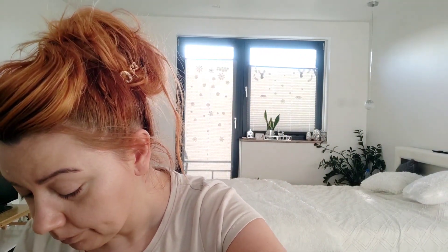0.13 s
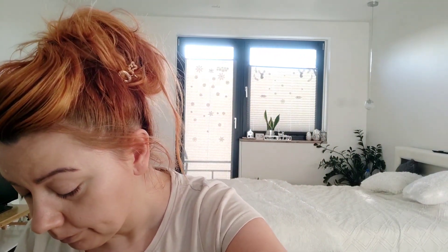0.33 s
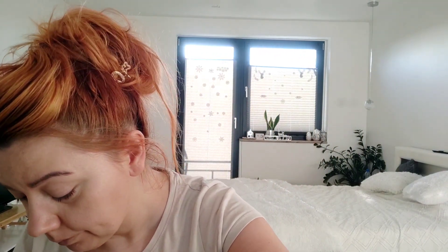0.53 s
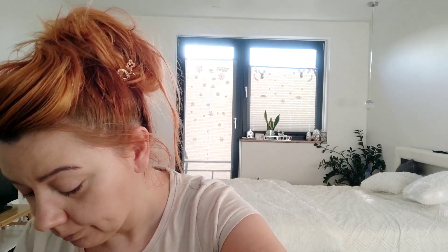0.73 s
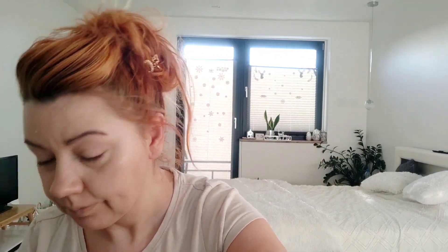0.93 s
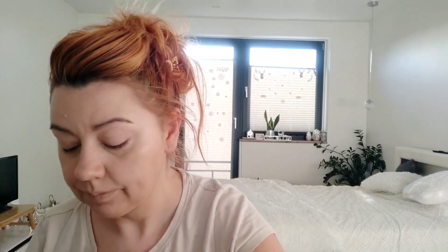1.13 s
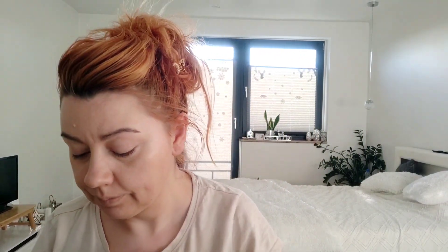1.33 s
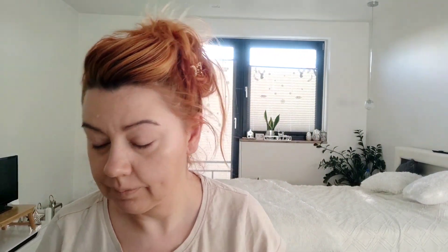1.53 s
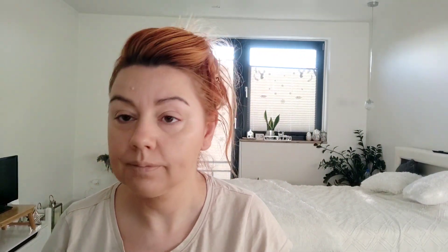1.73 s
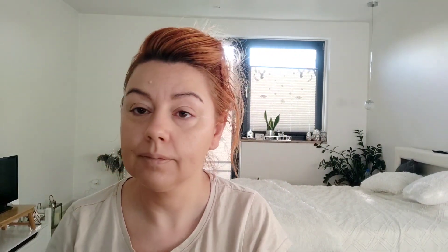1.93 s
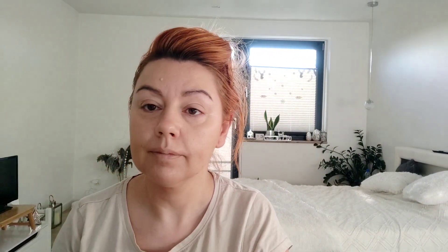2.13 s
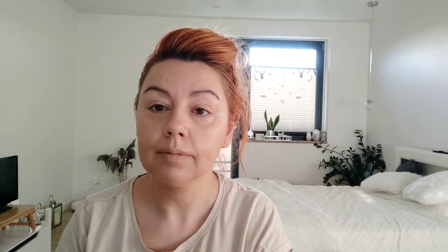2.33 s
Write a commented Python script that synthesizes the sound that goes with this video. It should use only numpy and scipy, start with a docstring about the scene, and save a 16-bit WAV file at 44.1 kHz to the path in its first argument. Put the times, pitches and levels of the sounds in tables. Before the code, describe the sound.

Rummaging in a drawer of small plastic containers, sharp clicks and hollow knocks in a bare bedroom

```python
"""Hard caps click and hollow jars clack and thump as small plastic containers are rummaged through in a
wooden desk drawer in a bare bedroom; shoves rattle and plastic rustles in between, over faint room tone.
Clicks are shaped noise, clacks and thumps dying modes; random impacts drive the rattle and the rustle.
Two spaced ports pick up the direct sound and the answering room."""
import sys
import numpy as np
from scipy import signal
from scipy.fft import rfft, irfft
from scipy.io import wavfile

SR = 44100
rng = np.random.default_rng(int(sys.argv[2]) if len(sys.argv) > 2 else 0)


def unload_wav(signal):
    """Save mono or channel-first audio to the path in sys.argv[1] as 16-bit WAV at rate SR, clipped to [-1, 1]."""
    wavfile.write(
        sys.argv[1],
        SR,
        np.round(np.clip(np.atleast_2d(signal).T, -1, 1) * 32767).astype(np.int16),
    )


def level_to_linear(level):
    """Convert decibel levels to linear amplitude factors, elementwise."""
    exponent = np.asarray(level, float) / 20
    return 10 ** exponent


N = 105531

# Room tone spectrum. Each row: frequency in Hz, relative level in dB.
HUM_SPECTRUM = [(25, 9.5), (212, 12), (2360, -56), (3590, -19), (6980, -26), (8920, -26), (11600, -27),
                (19600, -120)]
# Stirring hand. Each row: time in seconds, rattle level in dB, rustle level in dB (both before trim).
STIR = [(0, -37, -36), (0.198, -34.5, -39), (.33, -39.5, -45.5), (.45, -36.5, -43), (.52, -42.5, -39),
        (.64, -43.5, -45), (.82, -30, -32), (.93, -36.5, -34.5), (1.08, -29.5, -32), (1.2, -36, -40.5),
        (1.4, -51, -48.5), (1.579, -60.5, -65), (1.7, -41.5, -45), (1.93, -41.5, -45), (2.1, -34.5, -40.5),
        (2.25, -37, -39), (2.39, -50.5, -42)]
# Drawer modes. Each row: frequency in Hz, relative level in dB, t60 in seconds when thumped.
DRAWER_MODES = [(176.5, 1, 0.14), (273.6, 4, 0.08), (350, 2.5, 0.11), (452, -0.5, 0.21), (554, 1.5, 0.065),
                (618, 3, 0.044), (735, 1.5, 0.085), (848, 5, 0.055), (1066, 13, 0.016), (1240, -2.5, 0.1),
                (1496, -7, 0.053), (1530, -5, 0.089), (1650, 5.5, 0.017)]
# Spectrum of sliding plastic. Each row: frequency in Hz, relative level in dB.
RUSTLE_SPECTRUM = [(700, -45), (1200, -7.5), (3000, -13), (5000, -16), (6800, -10.5), (8600, -20),
                   (9600, -38.5), (13000, -42), (17000, -74)]
# Jars clacking on each other. Each row: start in seconds, peak in dB, pitch in Hz.
CLACKS = [(0.1411, -16, 1480), (0.176, -16, 1530), (0.295, -21, 1250), (0.3636, -21.5, 1530),
          (0.388, -18.5, 1830), (0.464, -16.5, 1442), (0.5073, -17.5, 1460), (0.646, -23.5, 1650),
          (0.7912, -4, 1370), (0.797, -11, 1495), (0.8368, -15, 1490), (0.9752, -10, 1240),
          (1.044, -13, 1125), (1.1076, -16.5, 2420), (1.1163, -7.5, 1693), (1.128, -14.5, 1650),
          (1.2376, -11, 1716), (1.2398, -13, 940), (1.7659, -32, 1160), (1.8578, -29.5, 1105),
          (1.9884, -19, 950), (2.0615, -27, 1740), (2.0788, -15.5, 1463), (2.164, -24.5, 1530)]
# Caps striking each other; the rows at 0.2955, 0.381 and 0.8336 s give instead the bright upper ring of jars
# clacking. Each row: start in seconds, peak in dB, cap pitch in Hz, contact length in seconds (time to fall 20
# dB).
CLICKS = [(0.142, -7.5, 6500, 0.00098), (0.174, -12.5, 7540, 0.008), (0.2955, -22, 2700, 0.0034),
          (0.381, -24.5, 2760, 0.0075), (0.461, -9.5, 2400, 0.0063), (0.468, -7, 8000, 0.0033),
          (0.51, -14.5, 2590, 0.0038), (0.62, -27.5, 7000, 0.01), (0.6701, -4, 2440, 0.0048),
          (0.7599, -6.5, 2830, 0.0027), (0.7855, -7.5, 7900, 0.0039), (0.7898, -3, 6300, 0.0055),
          (0.8336, -17, 2980, 0.0037), (0.8995, -16.5, 7350, 0.0065), (0.939, -21, 2550, 0.007),
          (0.97, -3, 5200, 0.0036), (0.977, -9, 7400, 0.0068), (1.033, -10.5, 7160, 0.005),
          (1.042, -24, 6400, 0.0023), (1.182, -15.5, 2820, 0.0014), (1.2375, -6.5, 7300, 0.0033),
          (1.395, -30, 6400, 0.003), (1.666, -23, 6540, 0.0084), (1.9895, -19.5, 2500, 0.0017),
          (2.0278, -22.5, 3630, 0.0027), (2.1885, -1, 5600, 0.0024), (2.2844, -7.5, 6840, 0.0043),
          (2.303, -16, 6150, 0.0088)]
# Spectrum of a cap's crack. Each row: frequency in Hz, relative level in dB.
CRACK_SPECTRUM = [(400, -3), (1200, -17), (2500, -2), (4200, -6.5), (6500, -7), (8500, -12), (10000, -21.5),
                  (13000, -22), (15500, -63), (20000, -47)]
# Jars thumping on the drawer floor. Each row: start in seconds, peak in dB, pitch in Hz.
THUMPS = [(0.176, -20, 350), (0.18, -19.5, 857), (0.391, -25.5, 275), (0.522, -22.5, 215),
          (0.672, -26, 335), (0.797, -15.5, 771), (0.838, -18, 746), (0.967, -16, 450), (0.975, -15, 815),
          (0.978, -16.5, 260), (0.999, -20, 721), (1.058, -20.5, 443), (1.079, -13.5, 735),
          (1.148, -21.5, 450), (1.1615, -19, 452), (1.171, -13.5, 833), (1.24, -23, 477),
          (1.608, -38.5, 316), (1.651, -33, 457), (1.668, -24, 350), (1.727, -24, 452), (1.769, -21, 434),
          (1.989, -18.5, 272), (2.0205, -6, 430), (2.0565, -13.5, 440), (2.085, -20, 455),
          (2.1775, -17.5, 422), (2.197, -20, 419)]
# Room decay. Each row: frequency in Hz, t60 in seconds.
ROOM_T60 = [(200, 0.31), (600, 0.48), (4000, 0.38), (10000, 0.27)]
# Left-right likeness of the room. Each row: frequency in Hz, likeness from 0 to 1.
ROOM_LIKENESS = [(100, 0.072), (400, 0.92), (1000, 0.025), (3000, 0.086)]
# Port colour. Each row: frequency in Hz, left minus right in dB.
PORT_DIFFERENCE = [(60, 6), (400, 3), (2000, 0), (4500, -3), (9000, -8.5), (13000, 2.5)]

HUM_RMS_DB, HUM_LIKENESS = -50, 0.75
RATTLES_PER_S, RATTLE_SPREAD_DB, RATTLE_TRIM_DB = 700, 3.2, -1
RATTLE_T60_SHARE = 0.41  # of the thumped t60
GRAINS_PER_S, GRAIN_SPREAD_DB, RUSTLE_TRIM_DB = 2500, 6.5, -1.5
RISE_S = 0.0009  # time constant of a mode's onset; also delays the plain crack
CLACK_T60_S, CLACK_NOISE_DB = 0.023, 2.5  # noise relative to note
OVERTONE_RATIO, OVERTONE_DB = 1.8, -12
CLICK_RISE_SHARE = 0.42  # of the contact length
CAP_HUMP_DB, CAP_HUMP_OCTAVES = 6.5, 0.2
THUMP_T60_S, DRAWER_DB, REACH_DB_PER_OCTAVE = 0.058, -9.5, 8
CRACK_ROOM_DB, JAR_ROOM_DB, SMALL_ROOM_DB = -6, -6, 2
NEAR_DB, NEAR_T60_S = 9, 0.02  # extra strength of the first taps
TURN_HZ = 7  # rate of passing round the three tails
LEFT_LEADS_S = 1.33e-4


def evened(x):
    """Scales to rms 1."""
    return x / np.sqrt(np.mean(x ** 2) + 1e-20)


def read(points, hz):
    """Table lookup on a log-frequency axis."""
    f, value = np.transpose(points)
    return np.interp(np.log(hz + 1), np.log(f + 1), value)


def colour(x, spectrum):
    """Filters x by a spectrum table."""
    gain = level_to_linear(read(spectrum, np.fft.rfftfreq(x.shape[-1], 1 / SR)))
    return irfft(rfft(x) * gain, x.shape[-1])


def add(mix, start_s, sound):
    """Mixes a sound in at a time."""
    part = mix[round(start_s * SR):][:len(sound)]
    part += sound[:len(part)]


def ring(hz, t60_s, size=6000):
    """One exponentially dying mode with a soft onset."""
    t = np.arange(size) / SR
    return level_to_linear(-60 * t / t60_s) * np.sin(2 * np.pi * hz * t) * (1 - np.exp(-t / RISE_S))


def sparse(per_s, spread_db):
    """Impacts at random times and of random sign, a few of them large."""
    size = level_to_linear(spread_db * np.minimum(rng.exponential(1, N), 4))
    return size * (rng.random(N) < per_s / SR) * rng.choice([-1, 1], N)


def stir(column):
    """Gain over time from the stirring curve."""
    curve = np.array(STIR)
    return level_to_linear(np.interp(np.arange(N) / SR, curve[:, 0], curve[:, column]))


def blend(a, b, likeness):
    """A second channel that resembles a by the given likeness, at equal power."""
    return likeness * a + np.sqrt(1 - likeness ** 2) * b


def hum():
    """Steady room tone: coloured noise, partly shared by the two sides."""
    a, b = rng.standard_normal((2, N))
    pair = np.array([a, blend(a, b, HUM_LIKENESS)])
    return level_to_linear(HUM_RMS_DB) * evened(colour(pair, HUM_SPECTRUM))


def rattle():
    """Many small shoves, each reaching the drawer modes by chance."""
    gain = stir(column=1)
    blows = sparse(RATTLES_PER_S, RATTLE_SPREAD_DB) * gain
    out = np.zeros(N)
    for hz, db, t60_s in DRAWER_MODES:
        reaching = blows * rng.standard_normal(N)
        mode = level_to_linear(db) * ring(hz, RATTLE_T60_SHARE * t60_s)
        out += signal.oaconvolve(reaching, mode)[:N]
    # level relative to the stirring curve
    return out / np.sqrt(np.mean((out / gain) ** 2)) * level_to_linear(RATTLE_TRIM_DB)


def rustle():
    """Fine crackle of sliding plastic: coloured random grains that follow the hand."""
    grains = sparse(GRAINS_PER_S, GRAIN_SPREAD_DB)
    return evened(colour(grains, RUSTLE_SPECTRUM)) * stir(column=2) * level_to_linear(RUSTLE_TRIM_DB)


def clacks():
    """Jar on jar: a short hollow note with one overtone, roughened by the scrape of contact."""
    out, size = np.zeros(N), 1024
    fade = level_to_linear(-60 * np.arange(size) / SR / CLACK_T60_S)
    for start_s, db, hz in CLACKS:
        note = ring(hz, CLACK_T60_S, size=2048)
        note += level_to_linear(OVERTONE_DB) * ring(OVERTONE_RATIO * hz, CLACK_T60_S / 2, size=2048)
        hiss = rng.standard_normal(size) * fade
        scrape = signal.oaconvolve(hiss, ring(hz, 0.004, size=size + 1))
        sound = note / np.linalg.norm(note) + level_to_linear(CLACK_NOISE_DB) * scrape / np.linalg.norm(scrape)
        add(out, start_s, level_to_linear(db) * sound / abs(sound).max())
    return out


def clicks():
    """Cap on cap (in a few rows, the bright upper ring of a clacking jar): a brief scrape coloured as a crack,
    with a broad hump at the cap's pitch. Also returns the plain cracks of equal energy that spread into the
    room."""
    hits, cracks, size = np.zeros(N), np.zeros(N), 2048
    t, f = np.arange(size) / SR, np.fft.rfftfreq(size, 1 / SR) + 1
    plain = np.roll(irfft(level_to_linear(read(CRACK_SPECTRUM, f))), round(RISE_S * SR))
    plain = plain[:len(f)]  # drops the half that wraps round
    for start_s, db, hz, length_s in CLICKS:
        rise = 1 - np.exp(-(t / (CLICK_RISE_SHARE * length_s)) ** 2)
        shape = rise * level_to_linear(-20 * t / length_s)
        hump = level_to_linear(CAP_HUMP_DB * np.exp(-0.5 * (np.log2(f / hz) / CAP_HUMP_OCTAVES) ** 2))
        hiss = colour(rng.standard_normal(size), CRACK_SPECTRUM)
        sound = irfft(rfft(hiss) * hump) * shape
        sound = level_to_linear(db) * sound / abs(sound).max()
        add(hits, start_s, sound)
        add(cracks, start_s, plain * np.linalg.norm(sound) / np.linalg.norm(plain))
    return hits, cracks


def thumps():
    """Jar on wood: the jar's note plus randomly reached drawer modes, favoured near that note."""
    out = np.zeros(N)
    for start_s, db, hz in THUMPS:
        wood = 0
        for mode_hz, mode_db, t60_s in DRAWER_MODES:
            reach_db = mode_db - REACH_DB_PER_OCTAVE * abs(np.log2(mode_hz / hz))
            wood = wood + rng.uniform(-1, 1) * level_to_linear(reach_db) * ring(mode_hz, t60_s)
        sound = ring(hz, THUMP_T60_S) + level_to_linear(DRAWER_DB) * wood
        add(out, start_s, level_to_linear(db) * sound / abs(sound).max())
    return out


def tail_of(x):
    """Room tail: sparse random taps, strong at first, with decay and left-right likeness by band."""
    taps = np.zeros((2, SR))
    at = np.arange(40, SR - 20, 20) + rng.integers(0, 20, (2, (SR - 41) // 20))
    np.put_along_axis(taps, at, rng.choice([-1., 1.], at.shape), 1)
    taps *= 1 + level_to_linear(NEAR_DB - 60 * np.arange(SR) / SR / NEAR_T60_S)
    hz, t, (a, b) = signal.stft(taps, SR, nperseg=256)
    pair = np.array([a, blend(a, b, read(ROOM_LIKENESS, hz)[:, None])])
    decay = level_to_linear(-60 * t / read(ROOM_T60, hz)[:, None])
    tail = signal.istft(pair * decay, SR, nperseg=256)[1]
    return signal.fftconvolve(x[None], tail / np.linalg.norm(tail[0]), axes=1)[:, :len(x)]


def room(x):
    """Three random room tails, passed round at a steady rate to even out the room's colour.
    The room already rings at the start."""
    x = np.r_[x[5999::-1], x]  # the opening, reversed, stands for earlier rummaging
    turn = 2 * np.pi * TURN_HZ * np.arange(len(x)) / SR
    wet = 0
    for k in range(3):
        share = np.sqrt((1 + np.cos(turn + k * 2 * np.pi / 3)) / 3)
        wet = wet + tail_of(x * share)
    return wet[:, -N:]


def to_ports(x, gain_of):
    """Filters x for the left and right ports; gain_of takes Hz and side (+0.5, -0.5)."""
    hz, side = np.fft.rfftfreq(N + 1, 1 / SR), np.array([[0.5], [-0.5]])
    return irfft(rfft(x, N + 1) * gain_of(hz, side), N + 1)[:, :N]


def scene():
    """Direct sound, earlier at the left port, plus the room's answer and its tone."""
    hits, cracks = clicks()
    jars = thumps() + clacks()
    small = rattle() + rustle()
    direct = to_ports(hits + jars + small,
                      lambda hz, side: np.exp(2j * np.pi * hz * side * LEFT_LEADS_S))
    wet = room(level_to_linear(CRACK_ROOM_DB) * cracks + level_to_linear(JAR_ROOM_DB) * jars + level_to_linear(SMALL_ROOM_DB) * small)
    return direct + wet + hum()


def band_limit(x):
    """A steep low-pass at the top of the band."""
    return signal.sosfilt(signal.butter(12, 16500, fs=SR, output="sos"), x)


def record(dry):
    """The two ports differ in colour; peaks clip at full scale."""
    ports = to_ports(dry, lambda hz, side: level_to_linear(side * read(PORT_DIFFERENCE, hz)))
    return band_limit(np.clip(ports, -1, 1))


dry = scene()
out = record(dry)
unload_wav(out)
```